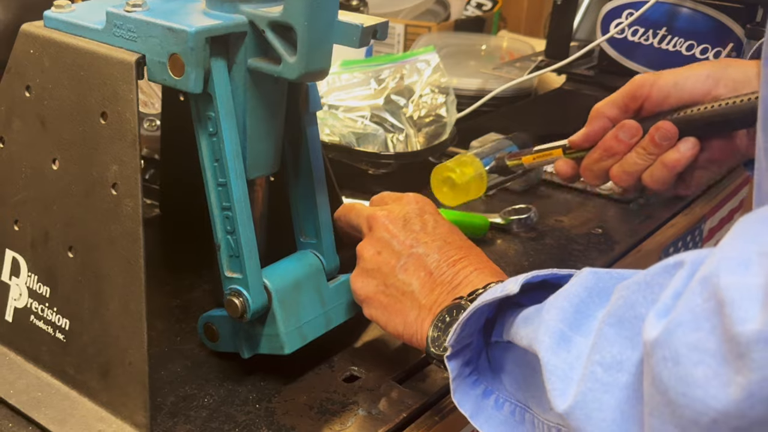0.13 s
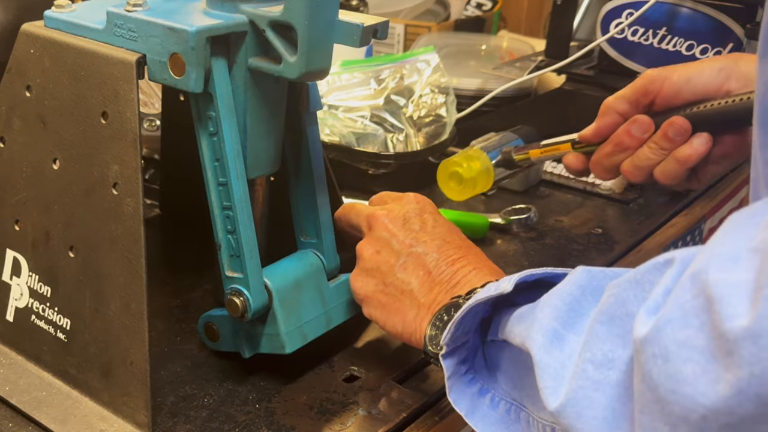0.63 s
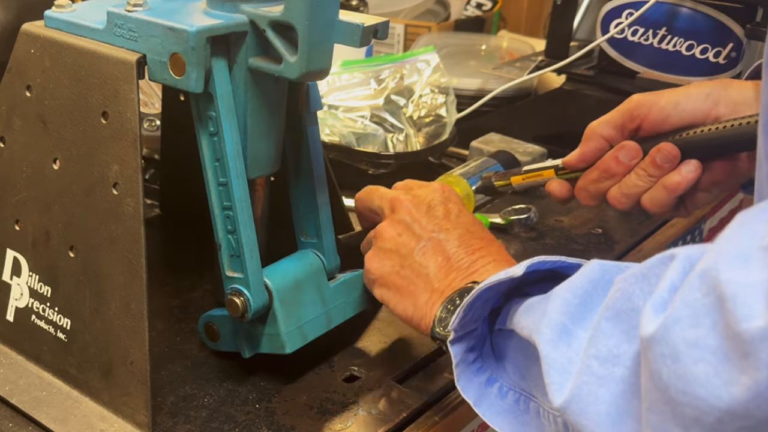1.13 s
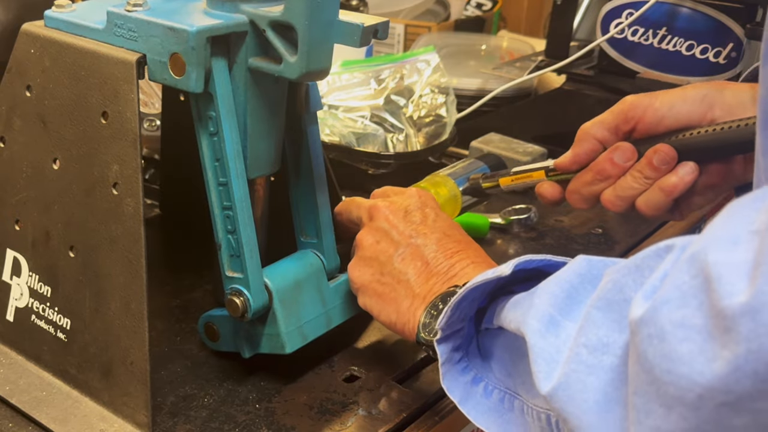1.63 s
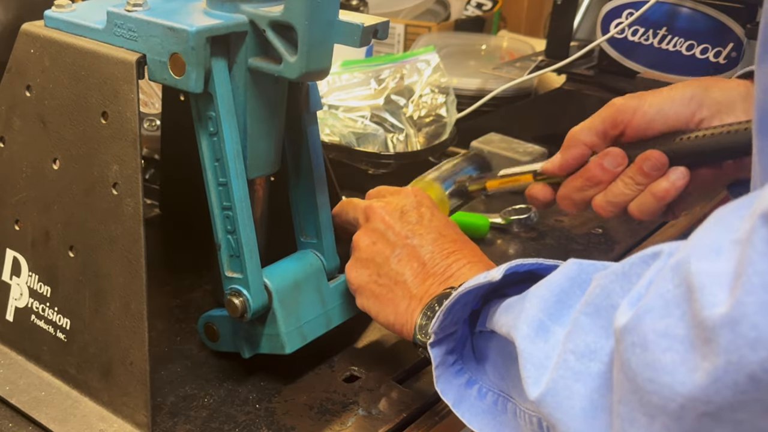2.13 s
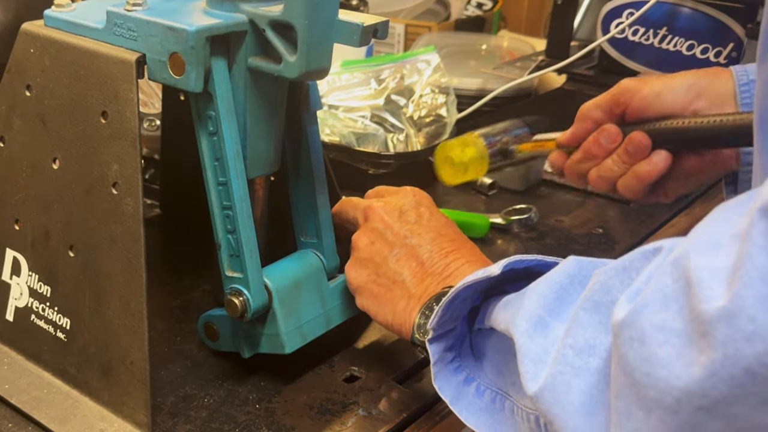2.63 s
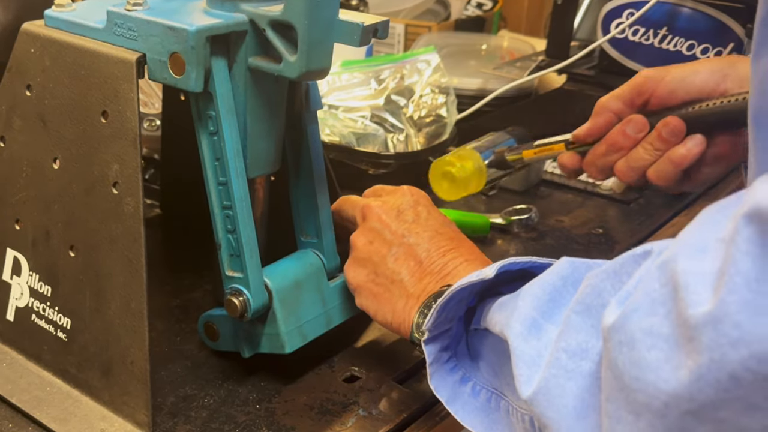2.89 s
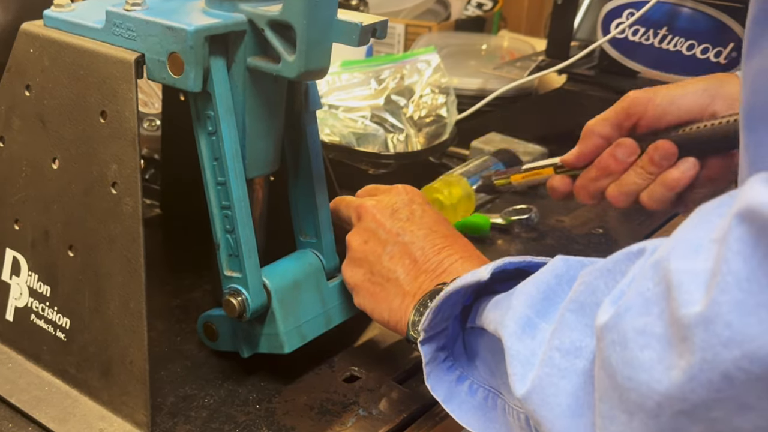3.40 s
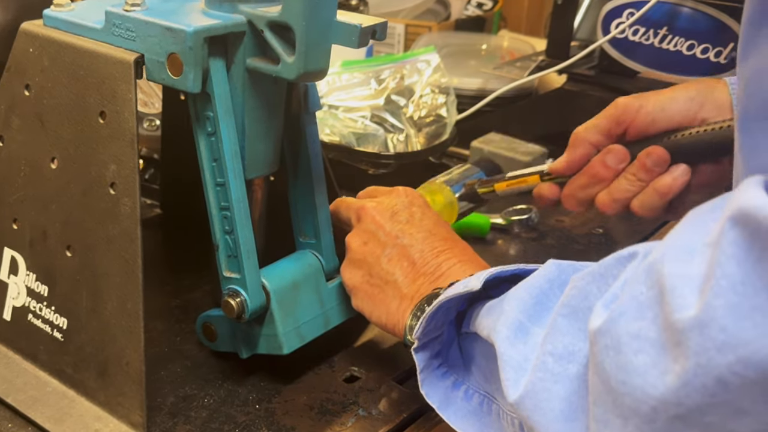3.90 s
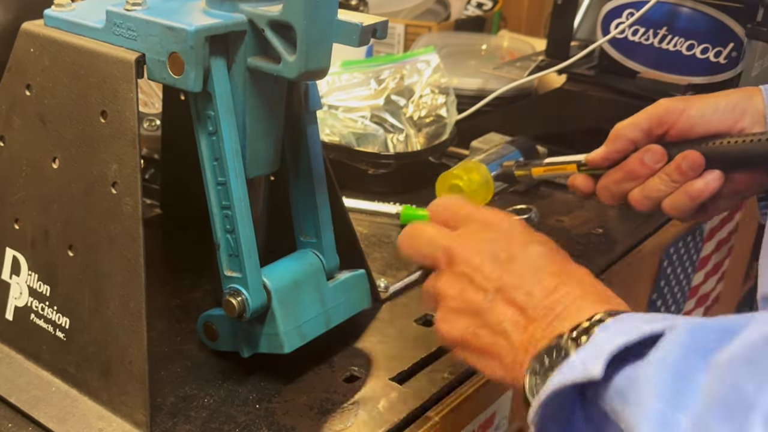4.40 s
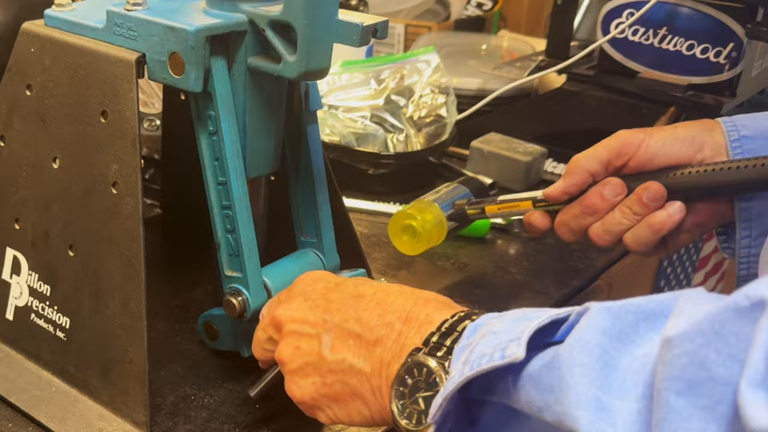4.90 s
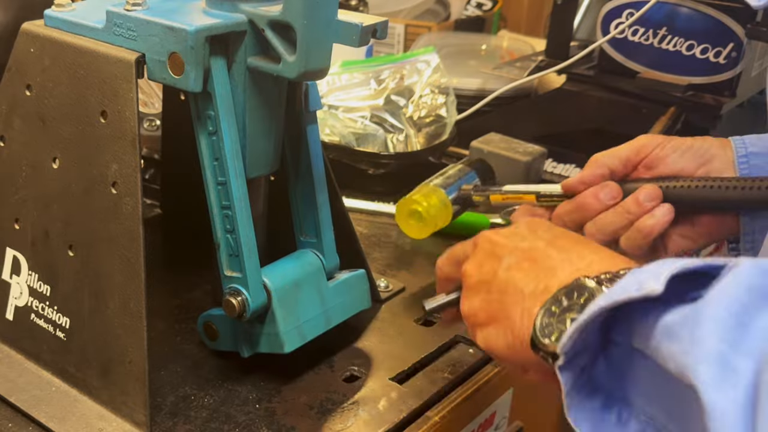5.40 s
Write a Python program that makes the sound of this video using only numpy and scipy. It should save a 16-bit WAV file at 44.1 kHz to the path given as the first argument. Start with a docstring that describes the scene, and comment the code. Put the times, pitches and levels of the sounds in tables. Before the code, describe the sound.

A close stereo microphone at a workbench, slightly stronger on the left, in a workshop with short reflections and a low, wavering murmur. The tail of a hammer blow dies away at the start, with a few light ticks. A firm, bright metal clank lands at 0.4 s, its cast frame and steel link ringing briefly, followed by rapid ticking, about thirteen a second, from 0.5 to 0.9 s. At 1.7 s comes a far softer, dull, boomy knock with faint ticks. Firm blows follow at 2.1, 2.7, 3.3 and 3.8 s, each a dense crunchy clatter with a sharp crack, ticks and jingling small hardware in between. Thin high tones linger after some blows, notably the last. From 4.0 to 4.6 s the loose part rattles on evenly, then stops; a faint high whine fades in from 4.1 s. Near 5.4 s a hand lightly stirs the hardware.

```python
"""A hammered punch on a pin in a cast metal linkage, heard close to a workbench over a low workshop murmur.
A blow from just before the start dies away; six more follow to 3.8 s, the second far softer but boomy. Each is
dense noise bands with a crack, plus decaying sines for the link, frame, stand and bench. Between and after
them a loose part ticks about 13 times a second (short sine knocks and noise) and small hardware jingles (sparse
impulses). Some blows leave a thin tone; from 4.1 s a faint noise whine fades in; at 5.4 s a hand stirs the hardware."""
import sys
import numpy as np
from scipy import signal
from scipy.fft import rfft, irfft, next_fast_len
from scipy.io import wavfile

SR = 44100
rng = np.random.default_rng(int(sys.argv[2]) if len(sys.argv) > 2 else 0)


def store_wav(level_fs):
    """Save 16-bit WAV to argv[1]."""
    pcm = np.round(np.clip(np.atleast_2d(level_fs), -1, 1) * 32767)
    wavfile.write(sys.argv[1], SR, pcm.T.astype(np.int16))


def elevation(decibels):
    """Turn decibel levels (scalar or array-like) into linear amplitude ratios."""
    levels = np.asarray(decibels, float)
    return 10 ** (levels / 20)


N = 243873


def evened(x):
    """Scales to unit rms."""
    return x / np.sqrt(np.mean(x ** 2) + 1e-20)


def read(points, hz, column=1):
    """Reads a table on a log frequency axis."""
    points = np.transpose(points)
    return np.interp(np.log(hz + 1), np.log(points[0] + 1), points[column])


def curve(rows):
    """Reads a table of (s, value) at every sample."""
    return np.interp(np.arange(N) / SR, *np.transpose(rows))


def add(mix, start_s, sound):
    """Mixes a sound in at start_s, cutting what falls outside the mix."""
    at = round(start_s * SR)
    part = mix[max(at, 0):][:len(sound) + min(at, 0)]
    part += sound[max(-at, 0):][:len(part)]


def coloured(x, gain):
    """Filters by a gain given as a function of Hz."""
    size = next_fast_len(x.shape[-1])
    spectrum = rfft(x, size) * gain(np.fft.rfftfreq(size, 1 / SR))
    return irfft(spectrum, size)[..., :x.shape[-1]]


def swell(start_s, db, rise_s, t60_s=np.inf):
    """Power over time of something that builds from start_s and dies away."""
    coarse = np.arange(0, N + 64, 64)
    t = np.maximum(coarse / SR - start_s, 0)
    level = elevation(db - 60 * t / t60_s) * (1 - np.exp(-(t / rise_s) ** 2))
    return np.interp(np.arange(N), coarse, level ** 2)


def knocks(t, per_s, uneven_db):
    """Sparse sharp contacts of uneven size and random sign; unit rms."""
    draw, size, sign = rng.random((len(t), 3)).T
    sizes = elevation(-uneven_db * np.log(size + 1e-2))
    return evened((draw < per_s / SR) * sizes * np.sign(sign - .5))


def ring(modes, t, rise_s, spread_db):
    """Decaying sines that build while the parts still collide; share and phase vary with each contact."""
    out = np.zeros(len(t))
    for hz, db, t60_s in modes:
        share, cycles = rng.standard_normal(2)
        decay = elevation(db + spread_db * share - 60 * t / t60_s)
        out += decay * np.sin(2 * np.pi * (hz * t + cycles))
    return (1 - np.exp(-t / rise_s)) * out


def fuzzy(modes, t, rise_s, t60_s):
    """Many tiny contacts, as noise in a few resonances, each one's share left to chance."""
    shares = elevation(1.5 * rng.standard_normal(len(modes)))

    def gain(f):
        return sum(share * elevation(db) / (1 + (2 * (f - hz) / width_hz) ** 2)
                   for (hz, width_hz, db), share in zip(modes, shares))

    noise = evened(coloured(rng.standard_normal(len(t)), gain))
    return noise * (1 - np.exp(-t / rise_s)) * elevation(-60 * t / t60_s)


# Murmur spectrum. Each row: frequency in Hz, relative density in dB per Hz.
MURMUR_SPECTRUM = [(12, -68.5), (20, -33), (49, 2.5), (145, -10), (197, -7), (431, -11.5), (510, -13.5),
                   (2570, -28), (2800, -33), (11000, -50), (15800, -51)]
# Murmur sinking and swelling. Each row: time in seconds, level in dB.
MURMUR_LEVEL = [(0, -56.5), (.6, -51.5), (.95, -57.5), (1.35, -70), (1.65, -65.5), (2.5, -54.5), (3.7, -51),
                (4.8, -58), (5.53, -55)]
# Left-right likeness of the murmur. Each row: frequency in Hz, likeness from 0 to 1.
MURMUR_LIKENESS = [(60, 1), (240, 0.87), (950, 0.083), (3770, 0.11), (15000, 0.048)]


def air():
    """Low workshop murmur: filtered noise, alike in both ears in the bass, mostly apart above."""
    def same(f):
        return np.clip(read(MURMUR_LIKENESS, f), 0, 1)

    left, other = rng.standard_normal((2, N))
    right = coloured(left, same) + coloured(other, lambda f: np.sqrt(1 - same(f) ** 2))
    murmur = coloured(np.array([left, right]), lambda f: elevation(read(MURMUR_SPECTRUM, f)))
    return elevation(curve(MURMUR_LEVEL)) * evened(murmur)


# Whine fading in. Its values: start in seconds, level in dB, rise in seconds.
WHINE_FADE = (4.1, -80, 0.59)


def whine():
    """Faint fuzzy whine: a narrow band of noise high in the murmur."""
    noise = coloured(rng.standard_normal(N), lambda hz: 1 / (1 + ((hz - 3075) / 70) ** 2))
    return np.sqrt(swell(*WHINE_FADE)) * evened(noise)


# Thin rings left by some blows. Each row: start in seconds, end in seconds, level in dB.
THIN_RINGS = [(-.14, .37, -64), (2.15, 2.71, -59), (3.85, 5.6, -59)]


def thin_ring():
    """A lightly damped pure tone left by some blows, cut off at each row's end."""
    tone = np.sqrt(2) * np.sin(2 * np.pi * 2704 * np.arange(N) / SR)
    power = np.zeros(N)
    for start_s, end_s, db in THIN_RINGS:
        power += swell(start_s, db, rise_s=.02, t60_s=3.3) * (np.arange(N) / SR < end_s)
    return np.sqrt(power) * tone


# Spectrum of rattling hardware. Each row: frequency in Hz, relative density in dB per Hz.
RATTLE_SPECTRUM = [(180, -35.5), (300, -6), (447, 1.5), (974, -9.5), (2270, -9.5), (5290, -10.5),
                   (7370, -18.5), (8700, -14), (14300, -15.5), (15800, -33)]
# Hardware shaken by a blow, then by a tick. Values: level against the event in dB, rise in seconds, t60 in seconds.
SHAKEN_BY_BLOW = (-24.5, .04, 0.86)
SHAKEN_BY_TICK = (-21, 0.046, 0.28)
# A hand stirs the hardware. Its values: start in seconds, level in dB, rise in seconds.
STIRRED = (5.4, -67, 0.154)


def jingle():
    """Small hardware shivers in dense tiny contacts, powered by the blows, the ticks and a hand."""
    shiver = coloured(knocks(np.arange(N), 5200, 0.7), lambda f: elevation(read(RATTLE_SPECTRUM, f)))
    power = swell(*STIRRED)
    for events, shaken in (BLOW_EVENTS, SHAKEN_BY_BLOW), (TICK_EVENTS, SHAKEN_BY_TICK):
        relative_db, rise_s, t60_s = shaken
        for start_s, db, *_ in events:
            power += swell(start_s, db + relative_db, rise_s, t60_s)
    return np.sqrt(power) * evened(shiver)


# Ticks of the rocking part. Each row: start in seconds, level in dB, knock pitch in Hz.
TICK_EVENTS = [(0.0385, -39.5, 1730), (0.1867, -43.5, 2214), (0.2578, -54.5, 2159), (0.5381, -37, 1773),
               (0.686, -36.5, 2200), (0.7596, -40, 2200), (0.834, -41.5, 2200), (0.9085, -42.5, 1466),
               (1.7812, -44, 1790), (1.8579, -49, 1770), (2.0596, -52.5, 2050), (2.327, -35, 1774),
               (2.3999, -38.5, 2315), (2.4772, -37, 2200), (2.5536, -40, 2110), (2.6271, -37.5, 2060),
               (2.8771, -29.5, 2380), (3.03, -35, 2403), (3.1097, -35.5, 2330), (3.1829, -34, 2394),
               (3.4553, -35, 2310), (3.6079, -35, 2191), (3.679, -39.5, 2260), (3.707, -36, 1640),
               (3.7585, -36.5, 2200), (4.0124, -33.5, 2250), (4.0953, -44, 2404), (4.1775, -36, 2227),
               (4.2524, -38.5, 2180), (4.329, -34.5, 2324), (4.4092, -39.5, 2250), (4.4857, -41, 2240),
               (4.5578, -35.5, 1620)]
# Resonances of the loose part. Each row: frequency in Hz, width in Hz, relative level in dB.
LOOSE_PART = [(2200, 400, -8), (5280, 120, 2), (6900, 81, -5), (7750, 420, -9.5), (8600, 650, -4),
              (10660, 930, -2)]
# Resonances of its other edge. Each row: frequency in Hz, width in Hz, relative level in dB.
OTHER_EDGE = [(3810, 200, -2), (10600, 600, -8)]


def tick(level_db, hz):
    """A three-cycle knock, a short rattle of the parts it shakes, and a softer touch if it rocks back."""
    back_s, flat_below_hz, flat_rattle_db = .038, 1700, -3
    t = np.arange(SR // 5) / SR
    knock = np.sin(2 * np.pi * hz * t) * np.sin(np.pi * np.minimum(t * hz / 2.9, 1))
    hiss = evened(coloured(rng.standard_normal(len(t)), lambda f: elevation(read(RATTLE_SPECTRUM, f))))
    rattle = hiss * (1 - np.exp(-t / .002)) * elevation(-8.5 - 60 * t / 0.13)
    again = elevation(-4.5) * rattle
    rocks = hz > flat_below_hz  # a lower tick is the part landing flat
    if rocks:
        again += elevation(-15) * fuzzy(OTHER_EDGE, t, rise_s=.004, t60_s=.09)
    add(rattle, back_s, again)
    add(rattle, .002, elevation(-12.5) * fuzzy(LOOSE_PART, t, rise_s=0.00067, t60_s=0.13))
    if not rocks:
        rattle *= elevation(flat_rattle_db)
    return elevation(level_db) * (knock + rattle)


# Collisions of punch, pin and linkage. Each row: band in Hz, relative level in dB, t60 of the tail in seconds.
CLATTER_BANDS = [(40, -34.5, 0.2), (83.9, -9.5, 0.4), (154, -13.5, 0.6), (290, -6.5, 0.4), (620, -11, 0.44),
                 (980, -9.5, 0.32), (1760, -9, 0.23), (3170, -11, 0.28), (5080, -15, 0.23),
                 (7060, -16.5, 0.31), (9500, -33, 0.067), (11300, -23, 0.39), (13500, -27, 0.067),
                 (16000, -38.5, .1)]


def clatter(t, brightness_db, hold_s, rise_s):
    """Dense collisions in overlapping bands: treble rises soonest, bass swells late."""
    noise = knocks(t, 3000, 0.81)
    out = np.zeros(len(t))
    for k, (hz, db, t60_s) in enumerate(CLATTER_BANDS):
        share = [(row[0], float(j == k)) for j, row in enumerate(CLATTER_BANDS)]
        band = evened(coloured(noise, lambda f: np.sqrt(read(share, f))))
        rise = 1 - np.exp(-(t / (rise_s * (1000 / hz) ** 0.61)) ** 2)
        fall_db = -60 * np.maximum(t - hold_s, 0) / t60_s
        fall = elevation(3.5 * fall_db) + elevation(fall_db - 8.5)  # the collisions stop fast, a thinner tail stays
        out += elevation(db + brightness_db * np.log2(hz / 1000)) * band * rise * fall
    return out


def crack(over_firm_db):
    """Steel crack as the punch meets the pin: a short burst of treble noise."""
    t = np.arange(SR // 50) / SR
    # a softer blow's crack is spared 0.43 of the loss in dB
    burst = rng.standard_normal(len(t)) * elevation(12.5 - 0.43 * over_firm_db)
    burst *= (1 - np.exp(-t / 0.0015)) * elevation(-60 * t / 0.018)
    return signal.sosfilt(signal.butter(2, [10200, 15500], "band", fs=SR, output="sos"), burst)


# Blows. Each row: start in seconds, strength in dB, then link ring, stand ring and bench boom in dB.
BLOW_EVENTS = [(-.14, -17.5, -1, -10.5, -7), (0.3604, -16, 5.5, -5, 0.5), (1.675, -37, -15.5, -15.5, 14.5),
               (2.1467, -15.5, 9, -4.5, -7), (2.6998, -14.5, -1.5, 2.5, -7.5), (3.2755, -14, 2.5, 5, -16.5),
               (3.8465, -14, -6, -1.5, -15.5)]
# Modes of steel stand, bench top, steel link, cast frame. Each row: frequency in Hz, relative level in dB, t60 in s.
STAND_MODES = [(2370, -18, 0.7), (7745, -34, 0.4)]
BENCH_MODES = [(135, -4, .33)]
LINK_MODES = [(1788, -23, 0.44), (2153, -16, .2), (3552, -18, .25), (5193, -16, .3), (6697, -25, .22),
              (8185, -28, 0.3)]
FRAME_MODES = [(200, -13, 0.4), (315, -5, 0.2), (368, -10, 0.3), (404, -3.5, 0.2), (550, -11, 0.2),
               (768, -9, .19), (1063, -9, .18), (1235, -14, 0.2), (1408, -7, 0.17), (1670, -14, 0.2),
               (1852, -13, .17), (2860, -13, .13), (3833, -16, .22), (8708, -30, .2)]


def blow(strength_db, link_db, stand_db, boom_db):
    """Returns the clear rings of the parts, and the clatter with the crack; softer blows are duller."""
    t = np.arange(SR) / SR
    over_firm_db = strength_db + 16  # a firm blow is -16 dB
    brightness_db = 0.17 * over_firm_db  # per octave
    rings = elevation(stand_db) * ring(STAND_MODES, t, rise_s=0.033, spread_db=.3)
    add(rings, .004, elevation(boom_db) * ring(BENCH_MODES, t, rise_s=.012, spread_db=.3))
    add(rings, .008, elevation(link_db) * ring(LINK_MODES, t, rise_s=0.0014, spread_db=0.5))
    frame = elevation(1) * ring(FRAME_MODES, t, rise_s=.004, spread_db=3.6)
    add(rings, .002, coloured(frame, lambda f: elevation(brightness_db * np.log2(f / 1000 + .1))))
    body = clatter(t, brightness_db, hold_s=0.016, rise_s=0.0093)
    add(body, .004, crack(over_firm_db))
    return elevation(strength_db) * rings, elevation(strength_db) * body


# Reflections. Each row: frequency in Hz, relative level in dB, t60 in seconds.
ROOM_BANDS = [(100, -23, 0.37), (280, -8, 0.067), (650, 3, 0.15), (2500, 1, 0.24), (6000, -6, 0.033),
              (12170, -24.5, 0.068)]


def room(x):
    """Sparse reflections of random sign, other ones for each ear, each band dying at its own speed."""
    first, gap = 120, 20  # samples
    taps = np.zeros((2, SR // 2))
    at = np.arange(first, SR // 2 - gap, gap)
    at = at + rng.integers(0, gap, (2, len(at)))
    np.put_along_axis(taps, at, rng.choice([-1., 1.], at.shape), 1)
    hz, t, z = signal.stft(taps, SR, nperseg=512)
    t60_s = read(ROOM_BANDS, hz, column=2)[:, None]
    decay = elevation(read(ROOM_BANDS, hz)[:, None] - 60 * t / t60_s) / np.sqrt(150 * t60_s)
    tail = signal.istft(z * decay, SR, nperseg=512)[1]
    tail[:, :first] = 0
    return signal.oaconvolve(x[None], tail, axes=1)[:, :len(x)]


# Balance of the two ports, scaled by side. Each row: frequency in Hz, left over right in dB.
PORT_BALANCE = [(60, 1.5), (150, 1.5), (380, -1), (950, 4.5), (2380, 6), (5980, 5), (15000, -3)]


def port(bench, side):
    """One microphone port: level by frequency and a time shift, as the right port is further from the bench."""
    lead_s = side * 2.7e-5
    return coloured(bench, lambda f: elevation(side * read(PORT_BALANCE, f)) * np.exp(2j * np.pi * f * lead_s))


def scene():
    """The bench reaches two microphone ports a little apart, plus its reflections and the murmur."""
    bench = jingle()
    for start_s, *row in TICK_EVENTS:
        add(bench, start_s, tick(*row))
    echoes = room(bench)
    bench += whine() + thin_ring()
    for start_s, *row in BLOW_EVENTS:
        rings, body = blow(*row)
        add(bench, start_s, rings)
        add(bench, start_s, body)
        add(echoes.T, start_s, room(body).T)  # hands and tools move, so each blow reflects a little differently
    return np.array([port(bench, 0.45), port(bench, -0.54)]) + echoes + air()


def top_cut(x):
    """Nothing passes above the cut-off."""
    return signal.sosfilt(signal.butter(12, 15950, fs=SR, output="sos"), x)


def record(dry):
    """The loudest peaks saturate softly."""
    mix = 1.415 * np.tanh(dry / 1.059)
    return top_cut(mix)


dry = scene()
out = record(dry)
store_wav(out)
```